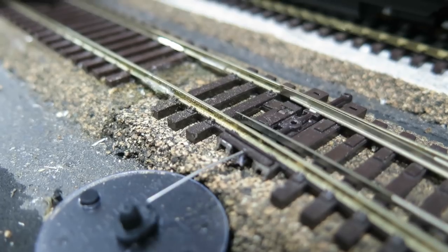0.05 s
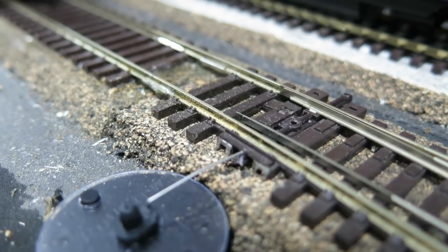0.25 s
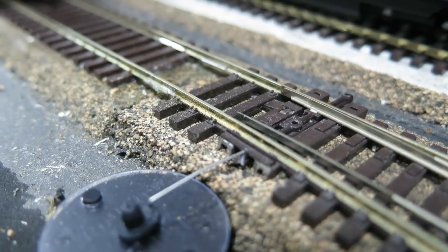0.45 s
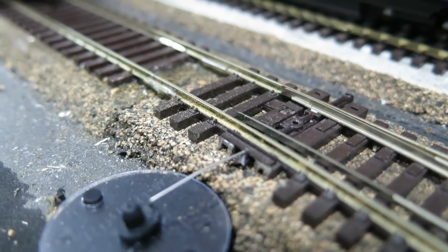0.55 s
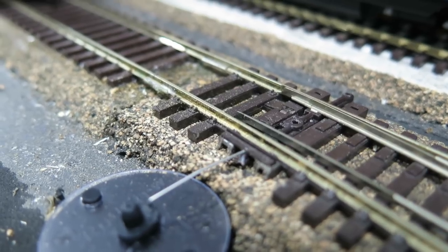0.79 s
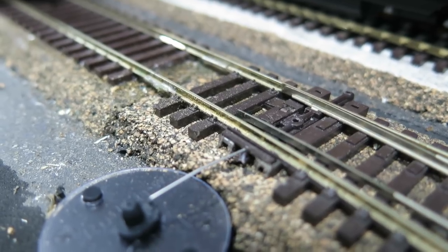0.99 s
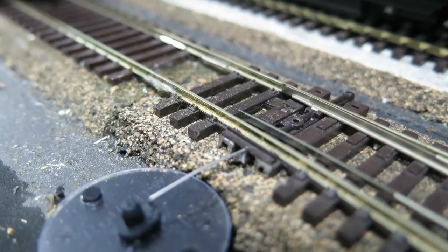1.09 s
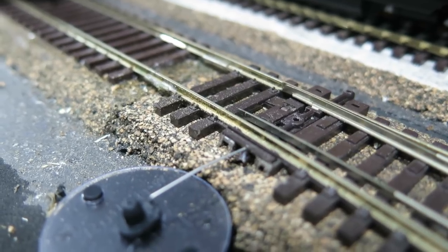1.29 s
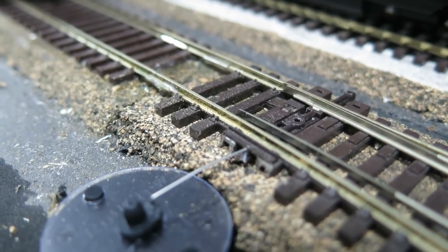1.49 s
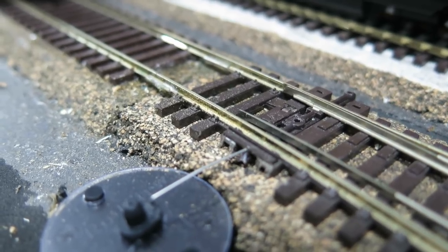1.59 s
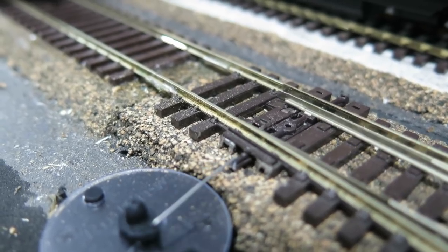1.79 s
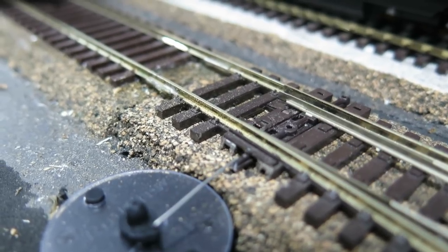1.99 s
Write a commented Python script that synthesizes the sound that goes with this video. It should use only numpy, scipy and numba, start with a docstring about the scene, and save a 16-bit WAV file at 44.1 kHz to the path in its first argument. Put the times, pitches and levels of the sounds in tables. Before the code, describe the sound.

Two hard flips of a little sprung lever switch, close up, with lighter ticks following

```python
"""A small toggle switch is flipped twice in a quiet hobby room, close to a stereo camera.
Steady room noise and faint hum lie under it all. In each flip the lever first ticks, then a sprung
mechanism rattles across and slams into its stop: noisy pushes ringing damped modes, with dull panel knocks.
The room answers briefly by convolution with decaying noise, and lighter ticks follow.
The camera's gain control ducks the room noise after each slam, holds, and creeps back up."""
import sys
import numpy as np
from scipy import signal
from scipy.io import wavfile
from scipy.ndimage import uniform_filter1d
from numba import njit

SR = 44100
rng = np.random.default_rng(int(sys.argv[2]) if len(sys.argv) > 2 else 0)


def linear_from_db(decibels):
    """Turn decibels (scalar or array-like) into linear amplitude factors; 0 gives 1."""
    return 10 ** (np.asarray(decibels, float) / 20)


def wrap_up_sound(samples):
    """Save the sound to the file named by the first command line argument, as 16-bit audio."""
    columns = np.atleast_2d(samples).T
    # keep every value between -1 and 1, then stretch to whole-number steps
    tamed = np.clip(columns, -1, 1)
    steps = np.round(tamed * 32767).astype(np.int16)
    wavfile.write(sys.argv[1], SR, steps)


N = 90404  # length in samples

# damped modes of the sprung mechanism: f/Hz, relative level/dB, t60/s
MECHANISM_MODES = [(280, -17.5, 0.042), (756, -15.5, 0.032), (1300, -19.5, 0.011), (2097, -21, 0.024),
                   (2950, -20, 0.024), (3420, 7.5, 0.0055), (4560, -20, 0.018), (4960, 11.5, 0.015),
                   (5630, 14.5, 0.0085), (6850, 11, 0.0075), (9100, 7.5, 0.015), (9500, 8, .005),
                   (10680, 12, 0.0077), (11700, 2, 0.0047)]


def unit_rms(x):
    """Normalisation: divides a signal by its root mean square."""
    return x / np.sqrt(np.mean(x ** 2) + 1e-20)


def curve(points, hz):
    """Spectral envelope: interpolates (f/Hz, value) points along a logarithmic frequency axis."""
    f, value = np.transpose(points)
    return np.interp(np.log(hz + 1), np.log(f + 1), value)


def air():
    """Stationary noise: Gaussian spectra shaped in frequency, partly coherent between left and right."""
    # spectral density of the room noise: f/Hz, relative level/dB per Hz
    density = [(12, -86), (20, -10), (42, -34), (65, -8), (251, -5.5), (305, -6.5), (492, -12.5),
               (551, -9.5), (599, -10.5), (1280, -18.5), (3420, -22), (15200, -35.5), (16500, -47.5)]
    # coherence of the two channels: f/Hz, left-right likeness
    likeness = [(60, 0.74), (130, 0.43), (290, -0.14), (640, 0.0075), (1410, 0.35), (3100, 0.58),
                (6820, 0.54), (15000, 0.73)]
    level_db = -47  # rms over both channels
    frames, hz = N // 512 + 5, np.fft.rfftfreq(2048, 1 / SR)
    a, b, c, d, patches = rng.standard_normal((frames, 1025, 5)).T
    # smoothing over frequency and time leaves faint drifting patches
    patches = uniform_filter1d(patches, size=12, axis=0)
    patches = unit_rms(uniform_filter1d(patches, size=6, axis=1))
    same = np.clip(curve(likeness, hz), -1, 1)[:, None]
    left = a + 1j * b
    right = same * left + np.sqrt(1 - same ** 2) * (c + 1j * d)
    spectrum = np.array([left, right]) * linear_from_db(curve(density, hz)[:, None] + 0.4 * patches)
    noise = signal.istft(spectrum, nperseg=2048, noverlap=1536)[1][:, :N]
    return linear_from_db(level_db) * unit_rms(noise)


def hum():
    """Narrow-band noise: low lines of some distant appliance, each wavering in level and phase."""
    # hum lines: f/Hz, rms level/dB, bandwidth/Hz
    lines = [(61, -49, 7.3), (76, -56, 40), (118, -57.5, 3.3), (202.8, -62.5, 3.3)]
    t, out = np.arange(N) / SR, np.zeros(N)
    for hz, db, width_hz in lines:
        r = np.exp(-np.pi * width_hz / SR)
        # the first second lets the smoothing filter settle
        waver = signal.lfilter([1 - r], [1, -r], rng.standard_normal((2, N + SR)))[:, SR:]
        in_phase = waver[0] * np.cos(2 * np.pi * hz * t)
        quadrature = waver[1] * np.sin(2 * np.pi * hz * t)
        out += linear_from_db(db) * unit_rms(in_phase + quadrature)
    return out


def room(x):
    """Reverberation: a diffuse tail dying band by band, and a much shorter cloud of near reflections."""
    # reverberation time of the diffuse tail: f/Hz, t60/s
    decay = [(300, 0.38), (1000, 0.38), (3000, 0.36), (6000, 0.35), (10000, .35), (15000, 0.11)]
    # colour of both tails before decay: f/Hz, relative level/dB
    colour = [(200, 2), (1000, -1.5), (3000, -2), (6000, -3.5), (10000, -11), (15000, -10)]
    same = 0.42  # left-right likeness of the noise
    far_db, near_db = -9, -8  # energy of each part before the onset fade
    near_t60_s = 0.077  # table top and nearby objects
    gap_s = .003  # onset fade
    a, b = rng.standard_normal((2, SR // 2))
    noise = np.array([a, same * a + np.sqrt(1 - same ** 2) * b])
    hz, t, z = signal.stft(noise, SR, nperseg=256)
    z *= linear_from_db(curve(colour, hz)[:, None])
    far = signal.istft(z * linear_from_db(-60 * t / curve(decay, hz)[:, None]), SR, nperseg=256)[1]
    tail_t = np.arange(far.shape[1]) / SR
    near = signal.istft(z, SR, nperseg=256)[1] * linear_from_db(-60 * tail_t / near_t60_s)
    tail = linear_from_db(far_db) * far / np.linalg.norm(far[0])
    tail += linear_from_db(near_db) * near / np.linalg.norm(near[0])
    tail *= np.clip(tail_t / gap_s, 0, 1) ** 2
    return signal.fftconvolve(x[None], tail, axes=1)[:, :N]


def room_answer(puffs):
    """Decorrelation: three unlike tails take turns, so that close hits do not echo alike."""
    turn_s = .004  # half a cycle of the weights, whose squares sum to one
    turn = np.pi * np.arange(N) / SR / turn_s
    return sum(room(puffs * np.sqrt(2 / 3) * np.cos(turn + k * np.pi / 3)) for k in range(3))


def body(modes):
    """Modal superposition: a stereo impulse response of a dry crack plus exponentially dying modes."""
    crack_db = -6  # relative to the left channel's modal energy
    lag_s, scatter_rad = .000028, .4  # delay of the right channel, random phase offset
    t = np.arange(2048) / SR
    out = np.zeros((2, len(t)))
    for (hz, db, t60), turn in zip(modes, rng.standard_normal(len(modes))):
        shift = np.array([[0], [scatter_rad * turn - 2 * np.pi * hz * lag_s]])
        out += linear_from_db(db - 60 * t / t60) * np.sin(2 * np.pi * hz * t + shift)
    out /= np.linalg.norm(out[0])
    out[[0, 1], [0, round(lag_s * SR)]] += linear_from_db(crack_db)
    return out


def impacts(rows, modes, sharpness):
    """Impact excitation: short rough pushes ring a body; also returns smooth puffs to excite the room."""
    rise_ms = 0.035
    ring, ms = body(modes), np.arange(512) * 1000 / SR
    out, puffs = np.zeros((2, N + 4096)), np.zeros(N + 4096)
    for (s, db, contact_ms, hz, pan_db), rough in zip(rows, rng.standard_normal((len(rows), 512))):
        push = np.sign(rough) + .5 * rough
        push *= (1 - np.exp(-ms / rise_ms)) * np.exp(-(ms / contact_ms) ** 2)
        # two passes of a resonance (sharpness is its Q) colour the push and a unit impulse alike
        colour = signal.iirpeak(hz, sharpness, SR)
        push, puff = signal.lfilter(*colour, signal.lfilter(*colour, [push, ms == 0]))
        sound = signal.fftconvolve(push[None], ring, axes=1)
        sound *= linear_from_db(db) / abs(sound.mean(0)).max()
        at = round(s * SR)
        out[:, at:at + sound.shape[1]] += linear_from_db(np.array([[.5], [-.5]]) * pan_db) * sound
        # the puff carries the energy of the left channel before panning
        puffs[at:at + 512] += puff * np.linalg.norm(sound[0]) / np.linalg.norm(puff)
    return out[:, :N], puffs[:N]


def panel_knocks():
    """Structure-borne sound: dull knocks passed on to the panel excite its modes."""
    # knocks: t/s, peak level of the channel mean before panning/dB, contact time/ms, centre f/Hz, left-right/dB
    knocks = [(.0905, -32, 3.2, 1444, 2), (.4648, -49, 0.72, 2500, 5), (.4690, -30, 3.6, 1200, 4),
              (.5142, -19, 3.6, 1620, 4), (.2035, -27, 1.7, 900, -15), (.2155, -27.5, 1.4, 900, 5),
              (1.7545, -21, 1.1, 900, 1.5), (1.9935, -43.5, 3.6, 2410, -24),
              (1.9975, -25.5, 0.5, 1150, 9.5), (2.0065, -31, 0.93, 800, -7), (2.0115, -27, 0.81, 1000, 8)]
    # damped modes of the panel: f/Hz, relative level/dB, t60/s
    panel = [(526, -7.5, 0.013), (756, -1, .04), (900, -14, 0.047), (1190, -8.5, 0.013), (1345, -7, 0.01),
             (1610, 0, 0.0067), (2000, -1.5, 0.027), (3320, 9.5, 0.024), (4000, -9, 0.012)]
    return impacts(knocks, panel, sharpness=0.77)


def lever_ticks():
    """Modal impact: light ticks of lever and contacts excite the small switch."""
    # ticks: t/s, peak level of the channel mean before panning/dB, contact time/ms, centre f/Hz, left-right/dB
    ticks = [(.0893, -16, .9, 9000, 0), (.4675, -9, .35, 11000, 0), (.4686, -10, .35, 10500, 0),
             (.5136, -6, .7, 9500, 0), (.2013, -7.5, 1.2, 7000, 0), (1.5987, -41, 1.2, 9500, 0),
             (1.6342, -37, .6, 8000, 0), (1.7433, -12, .6, 8000, 0), (1.9965, -2, .7, 7500, 0),
             (2.0087, -5.5, .6, 10000, 0)]
    # damped modes of the switch: f/Hz, relative level/dB, t60/s
    switch = [(3120, -12, .005), (4120, -10, .005), (5450, -6, .004), (6500, -1, .006), (7050, -6, .004),
              (8300, -3, .005), (9580, -2, .009), (10400, -3, .004), (12400, -6, .004)]
    return impacts(ticks, switch, sharpness=0.77)


def rattle():
    """Stochastic excitation: dense tiny knocks into the mechanism while it slides."""
    # travels of the mechanism: start t/s, length/s, rms level of the knocks before ringing/dB
    travels = [(0.2001, 0.024, -24.5), (1.7416, 0.03, -33)]
    swell_s, stop_s = .0015, .004  # fade in and out
    t = np.arange(N) / SR
    knocks = rng.standard_normal(N) * rng.exponential(1, N)
    level = np.zeros(N)
    for s, length, db in travels:
        swell = np.clip((t - s) / swell_s, 0, 1)
        level += linear_from_db(db) * swell * np.clip((s + length - t) / stop_s, 0, 1)
    push = level * unit_rms(knocks)
    return signal.fftconvolve(push[None], body(MECHANISM_MODES), axes=1)[:, :N]


def mechanism_blows():
    """Modal impact: the blows of the sprung mechanism excite its own modes."""
    # blows: t/s, peak level of the channel mean before panning/dB, contact time/ms, centre f/Hz, left-right/dB
    blows = [(.2060, -15, .6, 2500, 1), (.2100, -8.5, .7, 6000, 1), (.2132, -12, 1.3, 4800, 1),
             (.2155, -.8, 1.1, 6000, 1), (.2168, -4.5, .9, 6000, 1), (.2186, -3, .6, 5200, 1),
             (.2202, -11, .6, 3800, 1), (1.7460, -20, 1.2, 2200, 1), (1.7508, -16, 1.8, 2200, 1),
             (1.7543, -4.5, .6, 7000, 1), (1.7551, -.8, 1.1, 5500, 1), (1.7565, -1.5, .7, 6500, 1),
             (1.7595, -11, 1.0, 4500, 1), (1.7630, -15, 1.0, 6500, 1), (1.7665, -13, 1.0, 5000, 1)]
    return impacts(blows, MECHANISM_MODES, sharpness=0.482)


def scene():
    """Superposition: direct sounds, the room's answer and the background add linearly."""
    hits = [panel_knocks(), lever_ticks(), mechanism_blows()]
    slide = rattle()
    direct = sum(sound for sound, _ in hits) + slide
    puffs = sum(puff for _, puff in hits) + slide.mean(0)
    return air() + hum() + room_answer(puffs) + direct


@njit
def cut_wanted(level_db, knee_db, most_db, hold, step_db, ease_db):
    """Feedback control: a level over the knee at the present gain asks for the full cut, held then eased off."""
    out, cut_db, wait = np.zeros(len(level_db)), 0., 0.
    for n in range(len(level_db)):
        if level_db[n] - cut_db > knee_db:
            cut_db, wait = most_db, hold
        elif wait > 0:
            wait -= 1
        else:
            # recovery slows once the cut is below ease_db
            cut_db -= step_db * min(cut_db / ease_db, 1.)
        out[n] = cut_db
    return out


def gain_control(dry):
    """Dynamic compression: the short-term power steers a smoothed gain cut common to both channels."""
    knee_db, most_db, ease_db = -15, 13, 2.5
    attack_s, hold_s, recover_db_per_s = .0038, 0.25, 15.5
    power = abs(uniform_filter1d((dry ** 2).mean(0), size=256, origin=127))
    level_db = 10 * np.log10(power + 1e-12)
    cut_db = cut_wanted(level_db, knee_db, most_db, hold_s * SR, recover_db_per_s / SR, ease_db)
    # two equal one-pole smoothers
    r = np.exp(-1 / (attack_s * SR))
    cut_db = signal.lfilter([(1 - r) ** 2], [1, -2 * r, r ** 2], cut_db)
    return dry / linear_from_db(cut_db)


def top_cut(x):
    """Nothing passes above the cut-off."""
    return signal.sosfilt(signal.butter(12, 16980, fs=SR, output="sos"), x)


def record(dry):
    """Signal chain: gain control, low cut, overload by hard clipping, and band limit."""
    low_cut_hz, ceiling, edge_hz = 65, .92, 15900
    low_cut = signal.butter(2, low_cut_hz, "high", fs=SR, output="sos")
    x = signal.sosfilt(low_cut, gain_control(dry))
    clipped = np.clip(x, -ceiling, ceiling)
    band_limit = signal.firwin(255, edge_hz, window=("kaiser", 8), fs=SR)
    mix = signal.oaconvolve(clipped, band_limit[None], "same")
    return top_cut(mix)


dry = scene()
out = record(dry)
wrap_up_sound(out)
```